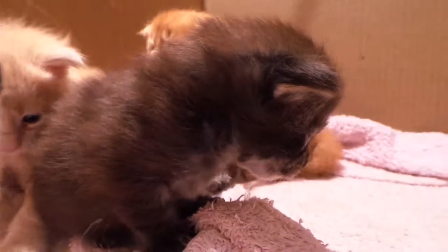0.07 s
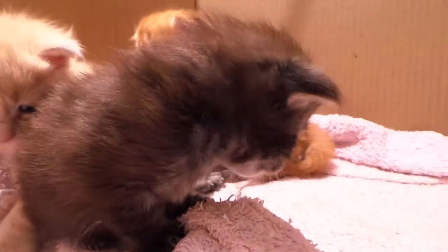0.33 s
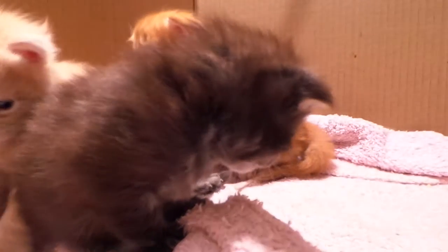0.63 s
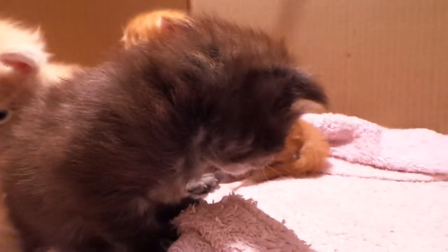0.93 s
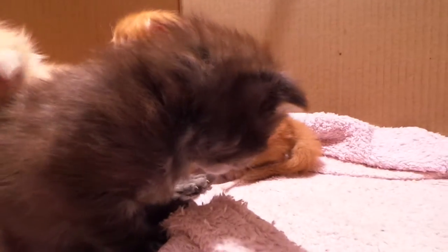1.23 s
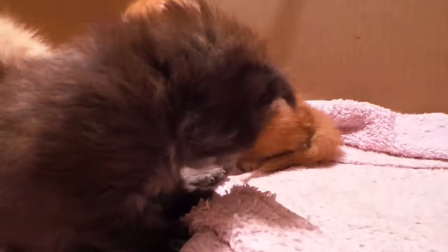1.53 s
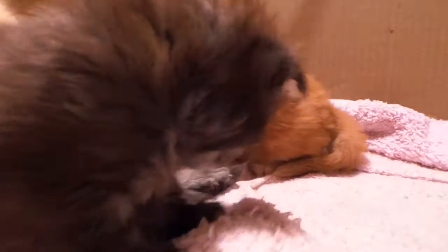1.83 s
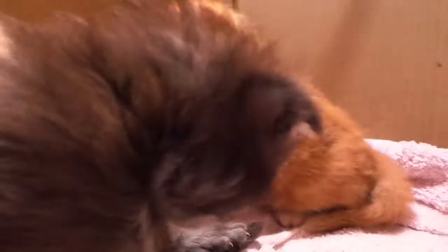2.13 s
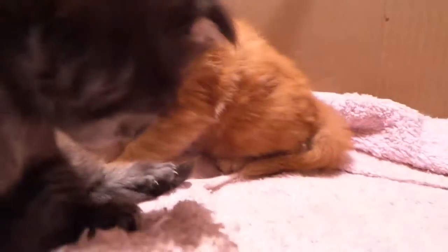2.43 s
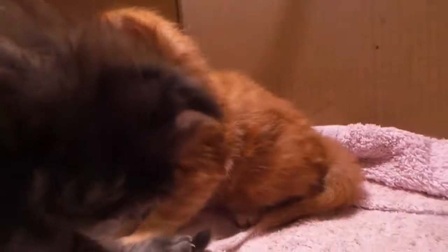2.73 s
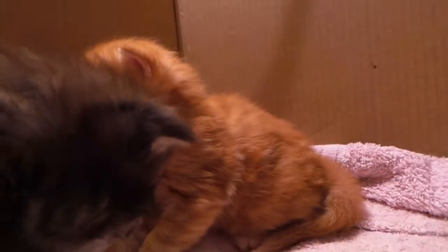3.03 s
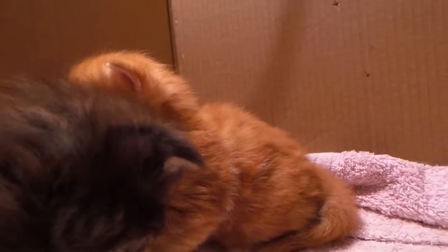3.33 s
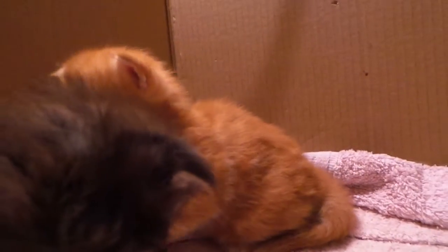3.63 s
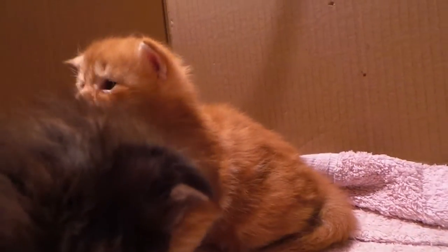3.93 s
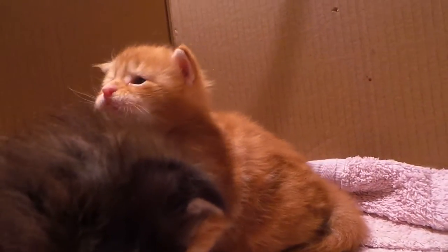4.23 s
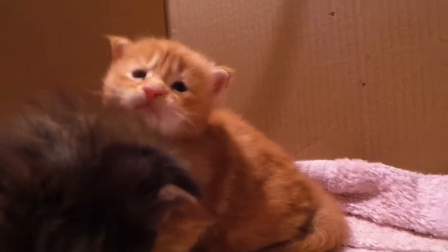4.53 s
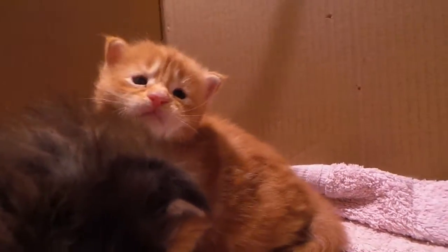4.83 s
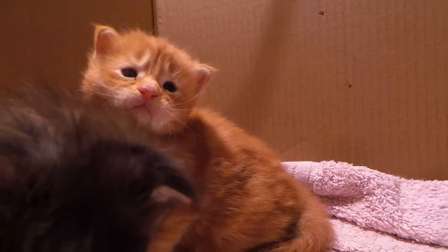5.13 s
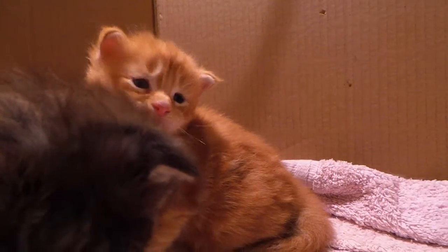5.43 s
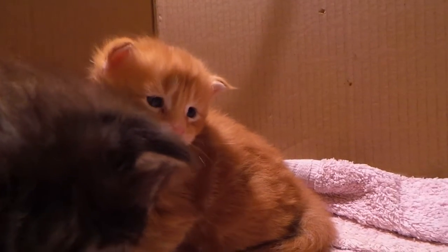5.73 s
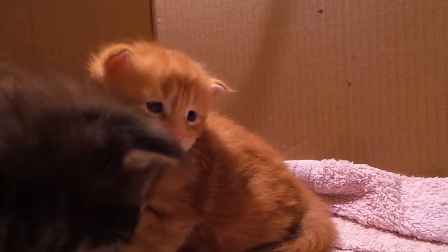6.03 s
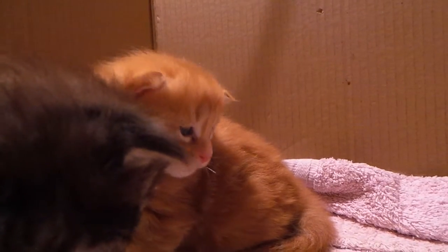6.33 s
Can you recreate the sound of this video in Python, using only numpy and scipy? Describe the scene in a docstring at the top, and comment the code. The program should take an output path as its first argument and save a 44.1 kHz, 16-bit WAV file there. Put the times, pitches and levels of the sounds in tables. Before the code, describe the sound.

Kittens move about on a towel in a cardboard box, close to the microphone. The first second is almost still: quiet room air, a low hum and faint camera ticking, about ten ticks a second, which continues throughout. Around 1.4 seconds a paw drags over the towel with a short hiss and two bright claw snaps. The strongest scratchy rustles follow at about 1.8 and 2.1 seconds, with soft, low thumps on the box. At 3 seconds comes one hollow knock, then a heavy, dull bump and a claw snag at 3.2. Softer fur brushing and light taps continue from 3.6 seconds. Between 4.5 and 5 seconds there is a quick cluster of bumps, scrapes and sharp claw clicks on cardboard, loudest near 4.7. Then the kittens settle, leaving the ticking and two tiny bumps around 6 seconds.

```python
"""Kittens clamber about on a towel in a cardboard box, close to a small camera's mono microphone.
Paws and fur drag over the terry loops, which hiss and shake the cardboard; claws snag, bodies bump
the box, and there is one hollow knock. Behind them lie a quiet room, a low hum and a faint,
regular ticking, probably the camera's lens drive."""
import sys
import numpy as np
from scipy import signal
from scipy.fft import rfft, irfft, next_fast_len
from scipy.io import wavfile
from scipy.ndimage import map_coordinates

SR = 44100
rng = np.random.default_rng(int(sys.argv[2]) if len(sys.argv) > 2 else 0)


def log_audio(samples):
    """Write samples as a 16-bit WAV file to the path given in sys.argv[1]."""
    # one column per channel
    frames = np.atleast_2d(samples).T
    # limit to full scale, then quantise
    limited = np.clip(frames, -1, 1)
    pcm = np.round(limited * 32767).astype(np.int16)
    wavfile.write(sys.argv[1], SR, pcm)


N = 285134


def amp(db):
    """Decibels to gain."""
    return 10 ** (np.asarray(db) / 20)


def decay(t, t60):
    """An envelope that falls 60 dB in t60 seconds."""
    return amp(-60 * t / t60)


def unit_rms(x):
    """x at rms 1."""
    return x / np.sqrt(np.mean(x ** 2) + 1e-20)


def unit_peak(x):
    """x at peak 1."""
    return x / (np.abs(x).max() + 1e-20)


def along(points, hz):
    """Interpolate (Hz, value) points on a log frequency axis."""
    point_hz, values = np.transpose(points)
    return np.interp(np.log(hz + 1), np.log(point_hz + 1), values)


def wobble(rate):
    """A smooth random curve, rate knots a second."""
    knots = rng.standard_normal(int(N * rate / SR) + 4)
    return map_coordinates(knots, [np.arange(N) * rate / SR])


def filtered(x, response):
    """x through a frequency response, given as a function of Hz."""
    size = next_fast_len(len(x) + 8192)
    return irfft(rfft(x, size) * response(np.fft.rfftfreq(size, 1 / SR)), size)[:len(x)]


def coloured(x, spectrum):
    """x shaped by (Hz, dB) points, at rms 1."""
    return unit_rms(filtered(x, lambda hz: amp(along(spectrum, hz))))


def resonate(x, modes):
    """x through (Hz, width in Hz, dB) resonances of alternating sign."""
    return filtered(x, lambda f: sum((-1) ** k * amp(db) * 1j * f * width / (hz**2 - f**2 + 1j * f * width)
                                 for k, (hz, width, db) in enumerate(modes)))


def ringing(modes, t, scatter_db):
    """Decaying (Hz, dB, t60) modes, each struck with a slightly different strength."""
    hz, db, t60 = np.transpose(modes)[:, :, None]
    strength = amp(db + scatter_db * rng.standard_normal(hz.shape))
    attack = 1 - np.exp(-t / 0.0016)
    return attack * np.sum(strength * decay(t, t60) * np.sin(2 * np.pi * hz * t), axis=0)


def add(track, start, sound):
    """Mix a sound into the track at start seconds."""
    part = track[max(round(start * SR), 0):][:len(sound)]
    part += sound[:len(part)]


# The quiet room around the box. Each row: frequency in Hz, relative level in dB.
AIR_SPECTRUM = [(15, -34), (25, -20), (81, 2), (114, 6), (170, -5.5), (234, -10), (267, -11), (506, -13.5),
                (579, -21.5), (716, -15), (985, -21), (1920, -19.5), (3010, -25.5), (6350, -27),
                (14500, -28)]

def background():
    """Room air with microphone hiss, a wavering hum, and tiny shifts of the resting kittens."""
    air = amp(-67.28) * coloured(rng.standard_normal(N), AIR_SPECTRUM)
    hum_phase = 2 * np.pi * 119 * np.arange(N) / SR + 1.3 * wobble(14)
    hum = amp(-81.5 + 2.3 * wobble(6)) * np.sin(hum_phase)
    stirring = amp(-80.5 + 6.1 * wobble(18)) * coloured(rng.standard_normal(N), WEIGHT_SPECTRUM)
    return air + hum + stirring


# The room's reverberation. Each row: frequency in Hz, seconds to fall 60 dB.
ROOM_DECAY = [(100, 0.23), (500, 0.21), (2500, 0.2), (12000, 0.05)]

def room(x):
    """A short diffuse tail reaches the microphone 5 ms late; its treble dies first."""
    hz, t, noise = signal.stft(rng.standard_normal(SR // 2), SR, nperseg=256)
    _, tail = signal.istft(noise * decay(t, along(ROOM_DECAY, hz)[:, None]), SR, nperseg=256)
    response = np.pad(tail, (SR // 200, 0)) / np.linalg.norm(tail)
    return signal.fftconvolve(x, response)[:N]


# How loud the ticking is at the microphone. Each row: time in seconds, peak level in dB.
TICK_LEVELS = [(0, -64), (.55, -61.5), (.95, -72), (1.4, -60.5), (4.2, -54), (5.2, -68.5), (5.76, -53.5),
               (6.46, -56)]
# The resonances of a tick. Each row: frequency in Hz, width in Hz, relative level in dB.
TICK_RESONANCES = [(150, 124, 0.5), (1690, 54, 6), (1990, 70, 0), (2180, 107, -1), (2840, 1160, -15)]

def ticking():
    """Ten small ticks a second, each a brief soft rattle, led by a weaker one."""
    track, t = np.zeros(N), np.arange(SR // 12) / SR
    envelope = (1 - np.exp(-t / 0.00078)) * decay(t, t60=0.066)
    for start in np.arange(.0595, N / SR, .1):
        db = np.interp(start, *np.transpose(TICK_LEVELS))
        for lead_s, lead_db in [(0, 0), (.012, -11)]:
            rattle = resonate(envelope * rng.standard_normal(len(t)), TICK_RESONANCES)
            add(track, start - lead_s, amp(db + lead_db) * unit_peak(rattle))
    return track


# Contact noise on the box. Each row: frequency in Hz, relative level in dB.
CRACK_SPECTRUM = [(200, -40), (800, 20), (2300, 6.5), (5000, -1), (14000, -7)]

def crack(t, edge_hz):
    """The brief noise of a contact, at peak 1, dull above edge_hz."""
    burst = coloured(rng.standard_normal(len(t)), CRACK_SPECTRUM) * decay(t, t60=0.021)
    lowpass = signal.butter(2, min(edge_hz, SR / 3), fs=SR)
    return unit_peak(signal.lfilter(*lowpass, burst))


# One hard knock nearby. Each row: start in seconds, level in dB.
KNOCKS = [(3.0184, -21.5)]
# Its hollow ring. Each row: frequency in Hz, relative level in dB, seconds to fall 60 dB.
KNOCK_RING = [(265, -22, 0.12), (433, 7, 0.024), (500, -1, 0.02), (680, -3.5, 0.038), (1146, -10, 0.02),
              (2310, -6, 0.012)]
# Its rough tail. Each row: frequency in Hz, relative level in dB.
KNOCK_TAIL_SPECTRUM = [(50, -22), (130, -0.5), (265, 4), (490, -5.5), (600, -3), (730, -6), (950, -15.5),
                       (1700, -25), (2300, -15.5), (2550, -20), (2900, -35.5)]

def knock():
    """A hollow knock, perhaps on the outside of the box, that scatters into a rough tail."""
    track, t = np.zeros(N), np.arange(SR // 3) / SR
    tail_envelope = (1 - np.exp(-t / 0.0088)) * decay(t, t60=0.24)
    for start, db in KNOCKS:
        ring = unit_peak(ringing(KNOCK_RING, t, scatter_db=-1.5))
        contact = amp(-8) * crack(t, edge_hz=5000)
        tail = amp(-12) * tail_envelope * coloured(rng.standard_normal(len(t)), KNOCK_TAIL_SPECTRUM)
        add(track, start, amp(db) * (ring + contact + tail))
    return track


# The cardboard box's modes. Each row: frequency in Hz, relative level in dB, seconds to fall 60 dB.
BOX_MODES = [(61, -7, 0.12), (90, -3.5, 0.12), (114.9, 3.5, 0.11), (169, 4, 0.067), (208, -8, 0.055),
             (229, -6.5, 0.21), (286, 1.5, 0.055), (342, -2, 0.064), (420, -1, 0.061), (498.4, -0.5, 0.043),
             (640, -6, 0.035), (790, -4, 0.058), (940, -7.5, 0.026), (1140, -8, 0.044), (1400, 3, .016),
             (1570, 3, .021), (2030, -13, .02)]

def thump(t, spot_hz, spread_octaves):
    """The box rings in the modes near the pitch of the struck spot, at peak 1."""
    hz, db, t60 = np.transpose(BOX_MODES)
    reach_db = -20 * np.log10(1 + np.abs(np.log2(hz / spot_hz) / spread_octaves) ** 3)
    # the paw's load detunes the upper modes a little differently each time
    loaded_hz = hz * (1 + .04 * (hz > 300) * rng.standard_normal(len(hz)))
    ring = ringing(np.transpose([loaded_hz, db + reach_db, t60]), t, scatter_db=2.9)
    # the paw goes on crumpling the towel after it lands, which roughens the ring
    crumple = 0.014 * coloured(rng.standard_normal(len(t)), CRACK_SPECTRUM) * decay(t, t60=0.037)
    force = (t == 0) + crumple
    return unit_peak(signal.fftconvolve(ring, force)[:len(t)])


# Paws land on the box, close by. Each row: start in seconds, level in dB, pitch of the struck spot
# in Hz, spread in octaves (wider also brightens the crack), crack level in dB against the thump.
PAW_BUMPS = [(.809, -52, 116, 0.63, -26), (1.357, -49, 407, 0.57, -24), (1.451, -38, 600, 1.12, -10),
             (1.778, -37, 1030, 0.37, -27), (1.791, -36, 196, 0.36, -28), (2.084, -30, 61, 0.34, -36),
             (2.148, -28.5, 217, 0.21, -29), (2.279, -41, 150, 0.26, -35), (2.476, -41.5, 730, 1.23, -11),
             (2.947, -42, 500, .77, -3.5), (3.2154, -24.5, 173, 0.17, -35), (3.2213, -20.5, 168, .3, -15),
             (3.723, -38, 450, .85, -23), (3.822, -38.5, 363, 0.76, -12), (4.478, -27.5, 206, 0.42, -28),
             (4.603, -30.5, 500, 1.8, -28), (4.618, -32, 550, 1.8, -20), (4.646, -25, 1390, 1.46, -3.5),
             (4.704, -32.5, 130, 1, -7), (4.746, -20, 390, 1.77, -5), (4.927, -30, 112, 1.1, -34),
             (4.945, -43, 830, 0.72, -14), (4.988, -38, 84.5, 0.68, -33), (5.889, -54.5, 300, 0.79, -19),
             (6.061, -55.5, 500, 0.6, -30)]

def bumps():
    """A paw thumps the box and its claws add a crack; then the body settles in fading thumps."""
    track, t = np.zeros(N), np.arange(SR // 3) / SR
    heavy_step_db, settle_gap_s, settle_loss_db = -20, .019, 9.5
    for start, db, spot_hz, spread, crack_db in PAW_BUMPS:
        paw = thump(t, spot_hz, spread)
        claws = amp(crack_db) * crack(t, edge_hz=9000 * spread)
        add(track, start, amp(db + 0.6) * (paw + claws))
        # the settling is only heard after a heavy step
        body_db = min(db, heavy_step_db + 2.6 * (db - heavy_step_db))
        for k in range(4):
            delay = (k + 1) * settle_gap_s + .002 * rng.standard_normal()
            settle = thump(t, spot_hz=130, spread_octaves=0.71)
            add(track, start + delay, amp(body_db - k * settle_loss_db) * settle)
    return track


# Claws slip off the towel's loops. Each row: start in seconds, level in dB, pitch in Hz.
CLAW_SNAGS = [(1.4198, -30.5, 5140), (1.4837, -28, 5860), (1.741, -39, 7100), (3.24, -30, 9000),
              (3.636, -47, 9000), (4.137, -41, 7000), (4.706, -33.5, 7400)]

def snags():
    """A claw lets go of a thread with a bright snap, echoed at once by the box wall."""
    track, t = np.zeros(N), np.arange(SR // 40) / SR
    for start, db, hz in CLAW_SNAGS:
        release = (t == 0) + .09 * rng.standard_normal(len(t)) * decay(t, t60=.012)
        band = signal.butter(3, [.62 * hz, min(1.38 * hz, SR / 3)], "bandpass", fs=SR)
        snap = amp(db + 2.5) * unit_peak(signal.lfilter(*band, release))
        add(track, start, snap)
        add(track, start + .002, .2 * snap)
    return track


# Reflections inside the box. Each row: delay in seconds, level in dB against the direct sound.
WALL_ECHOES = [(.0023, -8), (.0037, -9.5), (.0049, -22), (.0078, -25)]

def walls(x):
    """The near walls of the box repeat a sound within milliseconds and make it hollow."""
    echo = filtered(x, lambda hz: sum(amp(db) * np.exp(-2j * np.pi * hz * delay)
                                      for delay, db in WALL_ECHOES))
    return unit_rms(x + echo)


# The litter shuffles restlessly between strokes. Each row: time in seconds, hiss level in dB.
SHUFFLE_LEVELS = [(0, -87.5), (.95, -91), (1.3, -69), (1.6, -76.5), (1.95, -71), (2.55, -73), (2.8, -72),
                  (3.18, -76.5), (3.32, -70), (3.48, -74.5), (4.1, -71.5), (5.0, -84), (5.2, -80),
                  (6.46, -83.5)]
# Paws and fur sweep the towel, close to the microphone. Each row: start, rise, hold and fade in
# seconds, hiss level in dB, share of soft fur from 0 to 1, scrape and weight offsets in dB.
PAW_STROKES = [(1.04, 0.043, 0, .02, -70.5, .7, 0, 11.5), (1.385, 0.071, 0.013, .02, -47, 0.33, 1, 4),
               (1.648, 0.012, 0.011, 0.014, -65.5, 0.76, -4, 5),
               (1.724, 0.03, 0.075, 0.018, -51.5, 0.53, -6, -5),
               (1.783, 0.057, .016, 0.016, -37, 0.36, -1.5, -12),
               (2.008, 0.011, 0.032, 0.038, -51.5, 0.32, -3.5, -3),
               (2.062, 0.062, 0.043, 0.041, -37, 0.33, -0.5, 3),
               (2.236, 0.058, 0.19, 0.022, -56, 0.39, -2.5, -2),
               (2.471, .015, 0.071, 0.029, -70.5, 0.9, 12, 7),
               (2.845, 0.028, 0.015, 0.043, -63, 0.8, 1.5, 9),
               (2.902, 0.049, 0.15, 0.029, -65.5, 1, 2.5, 8),
               (3.202, 0.027, 0.019, 0.027, -48.5, 0.65, 5.5, 8.5),
               (3.608, 0.05, 0.094, 0.048, -64, 1, 6, 4.5), (3.68, 0.069, 0.12, 0.039, -51.5, 1, -2.5, -4),
               (4.1, 0.04, 0, 0.023, -62, 0.84, -9, 2), (4.244, 0.073, .19, 0.061, -57.5, 0.88, -3, 2.5),
               (4.465, 0.0093, .025, .03, -64.5, 1, 16, 14), (4.544, 0.051, 0.064, 0.039, -61, 1, 12.5, 16),
               (4.665, 0.041, 0.065, 0.064, -51.5, 0.6, -0.5, 5),
               (4.849, 0.06, 0.0078, 0.067, -55, 0.54, 4, 10.5)]

def dragging():
    """Gains of fibre hiss, fur, cardboard scrape and weight: shuffling and strokes add in power."""
    t = np.arange(N) / SR
    shuffle = amp(np.interp(t, *np.transpose(SHUFFLE_LEVELS)))
    moves = [(shuffle, 0.91, 3, 6.5)]  # gain, share of fur, scrape dB, weight dB
    for start, rise, hold, fade, db, fur, scrape_db, weight_db in PAW_STROKES:
        attack = np.sin(np.pi / 2 * np.clip((t - start) / rise, 0, 1)) ** 2
        release = np.exp(-(np.maximum(t - start - rise - hold, 0) / fade) ** 1.05)
        moves.append((amp(db) * attack * release, fur, scrape_db, weight_db))
    power = np.zeros((4, N))
    for gain, fur, scrape_db, weight_db in moves:
        power += np.outer([1 - fur, fur, amp(scrape_db) ** 2, amp(weight_db) ** 2], gain ** 2)
    catching = amp(1.02 * wobble(rate=45))  # a dragging paw catches and frees itself
    return np.sqrt(power) * catching


def slips(rate, scatter_db):
    """Tiny random releases of cotton loops, rate a second, of uneven size."""
    released = rng.random(N) < rate / SR
    return released * rng.choice([-1, 1], N) * amp(scatter_db * rng.standard_normal(N))


# The towel from close up: hard-dragged fibres, lightly brushing fur, scraped cardboard and the
# kittens' shifting weight. Each row: frequency in Hz, relative level in dB.
FIBRE_SPECTRUM = [(1100, -34.5), (1900, -10.5), (2800, -24), (3400, -18), (4200, -6), (6500, -1.5),
                  (7800, 0.5), (8700, -1.5), (11500, -5), (14500, -13)]
FUR_SPECTRUM = [(1200, -11), (2200, -4), (4000, -6.5), (6500, -9.5), (9000, -11), (14500, -16)]
SCRAPE_SPECTRUM = [(200, -11), (370, 0.5), (500, -2.5), (750, -6), (1100, -8), (1600, -7), (2300, -15),
                   (3200, -27.5)]
WEIGHT_SPECTRUM = [(18, -13), (32, -2.5), (60, -1.5), (115, 5.5), (205, 1), (270, -5.5), (400, -29.5)]
# Cardboard under a hard drag. Each row: frequency in Hz, width in Hz, relative level in dB.
WALL_RESONANCES = [(480, 70, -6), (790, 110, -11), (1380, 55, 0), (1530, 90, -2), (2100, 170, -13),
                   (2790, 120, -14)]

def towel():
    """Loops slip in clumps: they hiss, and the cardboard beneath answers the same slips."""
    fibre_gain, fur_gain, scrape_gain, weight_gain = dragging()
    clumps = amp(1.2 * wobble(rate=190))
    grains = slips(rate=12000, scatter_db=6.5) * clumps
    fibres = walls(coloured(grains, FIBRE_SPECTRUM))
    fur = coloured(slips(rate=15000, scatter_db=2.0), FUR_SPECTRUM)
    hiss = fibre_gain * fibres + fur_gain * fur
    # only a hard drag presses through the towel and makes the wall sing
    grip = np.clip((np.hypot(fibre_gain, fur_gain) / amp(-36.5)) ** 1.06, 0, .85)
    rubbing = coloured(slips(rate=3000, scatter_db=4.5) * clumps, SCRAPE_SPECTRUM)
    singing = unit_rms(resonate(grains, WALL_RESONANCES))
    scrape = np.sqrt(1 - grip) * rubbing + np.sqrt(grip) * singing
    weight = coloured(slips(rate=1200, scatter_db=1.5), WEIGHT_SPECTRUM)
    return amp(-0.33) * hiss + amp(-2.12) * scrape_gain * scrape + amp(-1.46) * weight_gain * weight


def scene():
    """All sounds meet at one microphone close to the kittens, which feeds both channels."""
    drag = towel()
    hits = bumps() + snags()
    reverb = room(amp(-20.5) * drag + amp(-13.0) * hits)
    mono = drag + hits + reverb + knock() + ticking() + background()
    return np.array([mono, mono])


def record(dry):
    """The camera keeps nothing above its band limit."""
    return np.array([filtered(channel, lambda hz: hz < 14750) for channel in dry])


dry = scene()
out = record(dry)
log_audio(out)
```